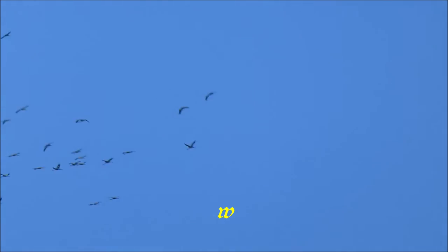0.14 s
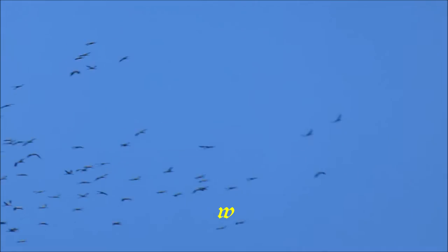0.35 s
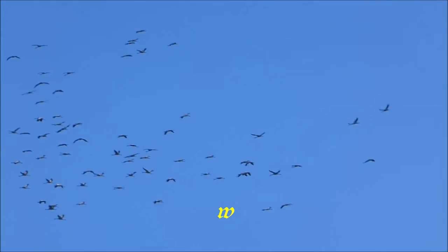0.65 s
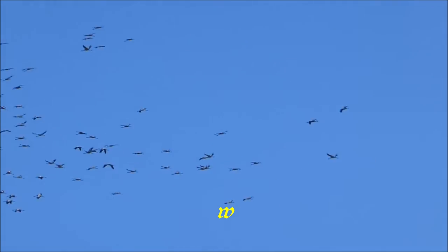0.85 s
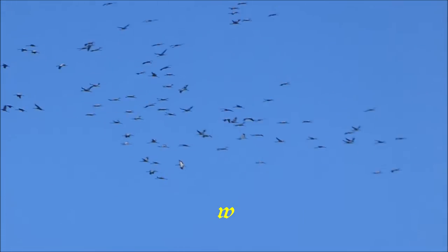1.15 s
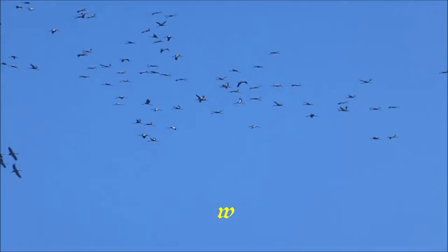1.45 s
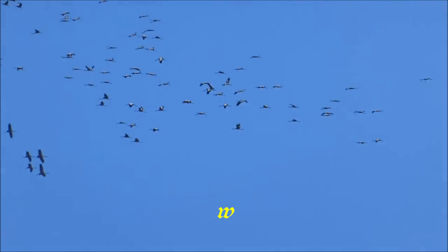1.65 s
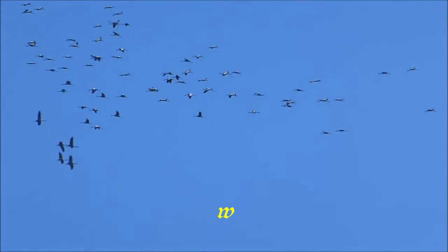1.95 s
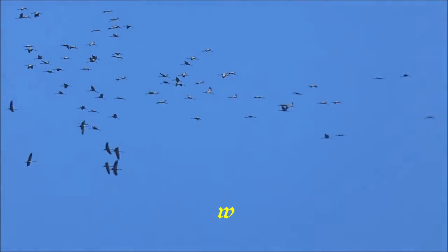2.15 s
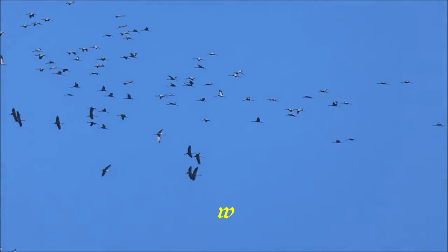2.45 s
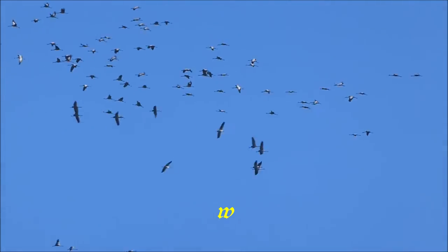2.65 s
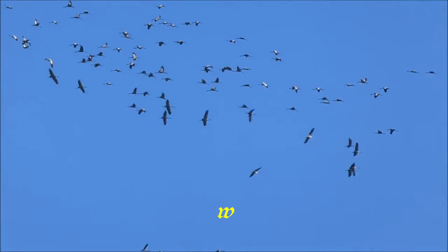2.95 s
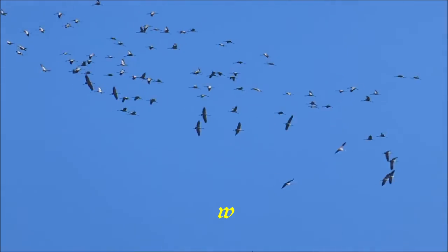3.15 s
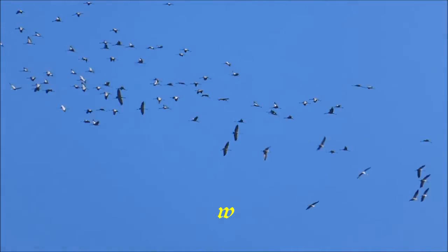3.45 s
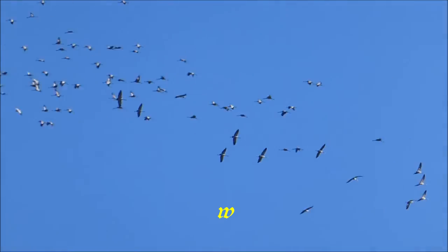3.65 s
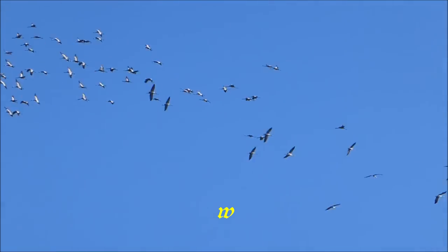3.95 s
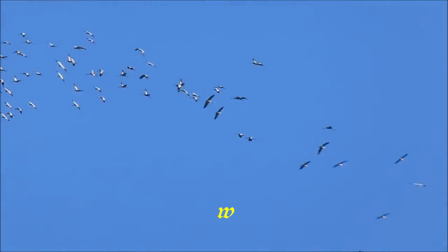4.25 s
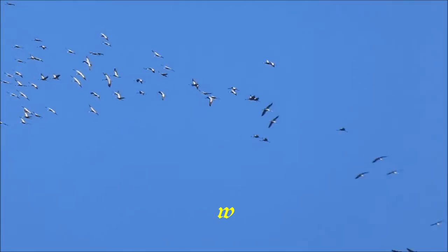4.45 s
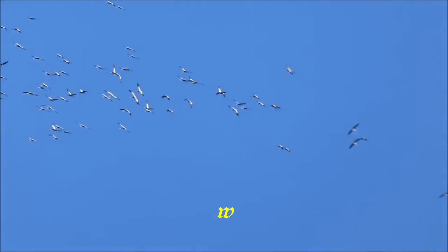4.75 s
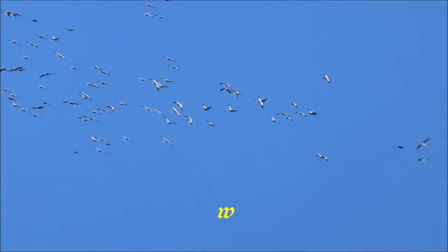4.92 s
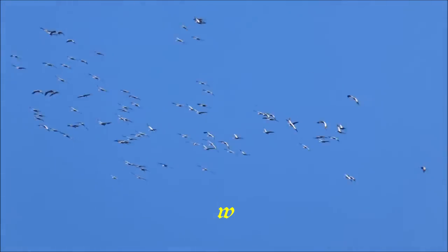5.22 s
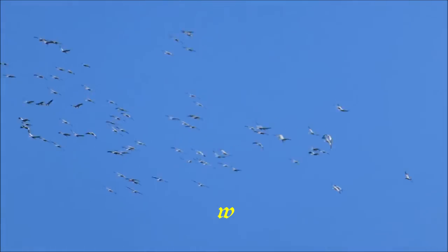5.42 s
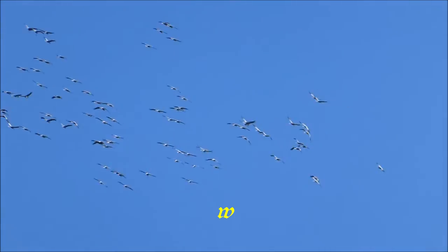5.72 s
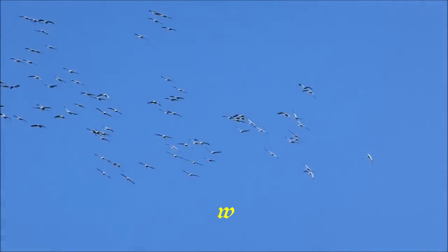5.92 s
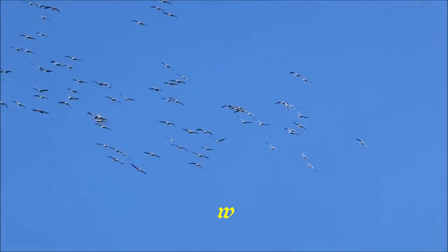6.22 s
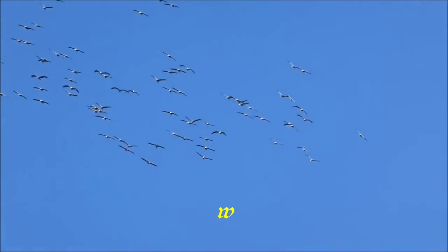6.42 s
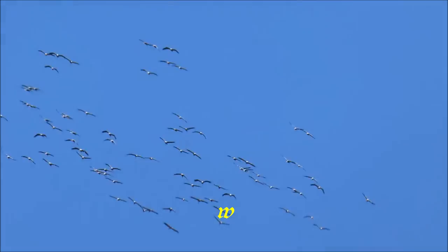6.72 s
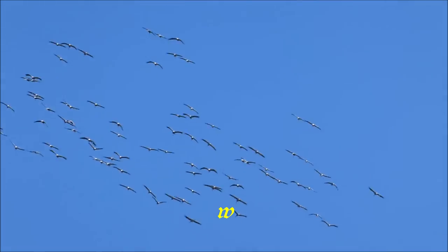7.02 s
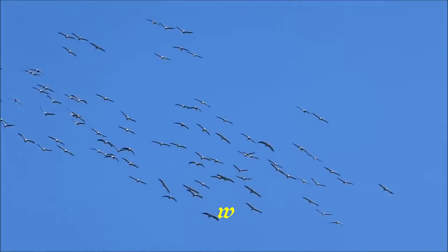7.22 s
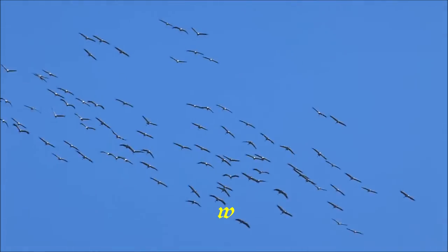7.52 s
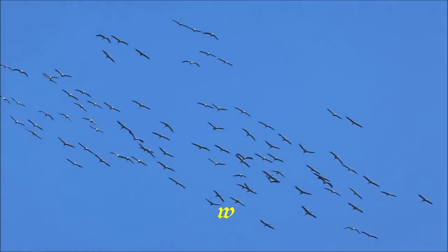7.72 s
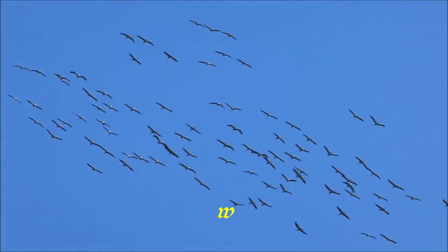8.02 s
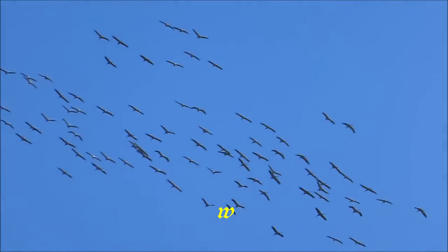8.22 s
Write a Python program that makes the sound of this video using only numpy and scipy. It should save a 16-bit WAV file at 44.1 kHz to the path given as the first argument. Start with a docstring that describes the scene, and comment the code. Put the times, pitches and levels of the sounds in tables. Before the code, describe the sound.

A large flock of cranes trumpets high overhead, many short rolling calls overlapping in a chorus that swells and sinks. In the first three seconds, three sharp handling clicks sound right at the microphone, and songbirds whistle and buzz in the trees. The cranes carry on and grow a little louder near the end, over a soft, distant outdoor rush.

```python
"""Cranes passing overhead

A large flock trumpets high above, its rolling calls pulsed by the syrinx and filtered by the windpipe.
Songbirds whistle and buzz in echoing trees, over a distant rush of open country, a faint low drone
and a brief opening hiss. A hand rubs a camera, whose shell clicks three times by stick-slip friction;
its gain control ducks after each click."""
import sys
import numpy as np
from scipy import signal
from scipy.fft import rfft, irfft
from scipy.io import wavfile
from scipy.ndimage import uniform_filter1d

SR = 44100
rng = np.random.default_rng(int(sys.argv[2]) if len(sys.argv) > 2 else 0)


def dump(signal):
    """Clip the signal to [-1, 1] and save it as 16-bit WAV at the path in sys.argv[1]."""
    limited = np.clip(np.atleast_2d(signal).T, -1, 1)
    pcm = np.round(limited * 32767).astype(np.int16)
    wavfile.write(sys.argv[1], SR, pcm)


N = 369116
TIME = np.arange(N) / SR


def gain_of(db):
    """Amplitude ratio of a level in decibels."""
    return 10 ** (np.asarray(db) / 20)


def unit_rms(x):
    """Normalisation to an rms of 1."""
    return x / np.sqrt(np.mean(x ** 2) + 1e-20)


def at_hz(points, hz):
    """Interpolation of a table on a logarithmic frequency axis."""
    f, value = np.transpose(points)
    return np.interp(np.log(hz + 1), np.log(f + 1), value)


def add(mix, s, sound):
    """Superposition of a sound at time s, cut to fit the mix."""
    start = round(s * SR)
    sound = sound[max(-start, 0):]
    part = mix[max(start, 0):][:len(sound)]
    part += sound[:len(part)]


def wander(t, per_s, size=256):
    """Random modulation: straight lines joining per_s Gaussian values a second."""
    return np.interp(t * per_s, np.arange(size), rng.standard_normal(size))


def arch(u, start, middle, end):
    """Parabolic glide through three pitches as u goes from 0 to 1."""
    return start * (1 - u) * (1 - 2 * u) + 4 * middle * u * (1 - u) + end * u * (2 * u - 1)


def woods(x, wet_db, linger=1):
    """Reverberation by scattering from trunks and crowns; each band decays at its own rate."""
    # decay of the echo: f/Hz, T60/s
    decay_times = [(500, 0.99), (1500, 1), (4000, 0.54), (8000, 0.5), (15000, 0.38)]
    reflections = rng.standard_normal(SR) * (rng.random(SR) < .05)
    hz, t, bands = signal.stft(reflections, SR, nperseg=256)
    t60 = linger * at_hz(decay_times, hz)[:, None]
    envelope = np.exp(-np.log(1000) * t / t60) * np.minimum(t / 0.0057, 1)
    tail = signal.istft(bands * envelope, SR, nperseg=256)[1]
    return x + gain_of(wet_db) * signal.fftconvolve(x, tail / np.linalg.norm(tail))[:N]


def distant_rush(level_db=-53.5, treble_rise=0.66):
    """Partially coherent noise: open country reaches the two microphones slightly unalike."""
    # spectral density: f/Hz, relative level/dB
    spectrum = [(25, -53), (60, -30), (85, -16.5), (125, -13), (190, -14), (270, -21), (370, -3.5),
                (480, 1.5), (750, -0.5), (1400, -4.5), (2000, -7.5), (2700, -14.5), (3150, -17),
                (3600, -15), (4550, -20.5), (5050, -18), (5800, -20), (7700, -27.5), (9900, -19.5),
                (15500, -29.5)]
    # slow fade: t/s, relative level/dB
    fade = [(0, -59.5), (1.3, -59), (3.3, -61), (4.7, -60.5), (8.37, -66.5)]
    # how strongly each band follows the fade: f/Hz, factor
    fade_weights = [(100, 0.42), (170, 0.43), (270, 3.2), (420, 0.99), (700, 0.6), (6000, 0.23)]
    # likeness of left and right: f/Hz, correlation
    coherence = [(30, 0.5), (90, 0.99), (200, 0.9), (380, 0.98), (800, 1), (1400, 1), (2400, 0.98),
                 (4400, 0.97), (8000, 0.92), (15000, 0.23)]
    hz, t, bands = signal.stft(rng.standard_normal((2, N)), SR, nperseg=2048)
    hz = hz[:, None]
    s, fade_db = np.transpose(fade)
    drift_db = at_hz(fade_weights, hz) * np.interp(t, s, fade_db - fade_db.mean())
    drift_db += at_hz([(700, 0), (6000, 0.67)], hz) * treble_rise * (t - t.mean())
    patches = uniform_filter1d(rng.standard_normal(bands.shape[1:]), size=14, axis=0)
    flicker_db = 1.5 * unit_rms(uniform_filter1d(patches, size=8, axis=1))
    mid, side = bands * gain_of(at_hz(spectrum, hz) + drift_db + flicker_db)
    correlation = at_hz(coherence, hz)
    side *= np.sqrt((1 - correlation) / (1 + correlation))
    stereo = signal.istft(np.array([mid + side, mid - side]), SR, nperseg=2048)[1]
    return gain_of(level_db) * unit_rms(stereo[:, :N])


def high_hiss(level_db=-60):
    """Spectrally shaped noise: a thin hiss that stops abruptly."""
    # spectral density: f/Hz, relative level/dB
    spectrum = [(7500, -12.5), (8700, -14), (9300, 5), (11500, 0), (12900, 1), (13800, -9), (16000, -19)]
    colour = gain_of(at_hz(spectrum, np.fft.rfftfreq(N, 1 / SR)))
    hiss = unit_rms(irfft(rfft(rng.standard_normal(N)) * colour, N))
    return gain_of(level_db) * hiss * np.interp(TIME, [.36, .4], [1, 0])


def drone(hz=103, wander_per_s=11, gain_db=-6):
    """Narrow-band noise: two randomly modulated carriers in quadrature give a far, wavering note."""
    # swell and fade: t/s, relative level/dB
    swells = [(0, -75), (1.1, -80), (4.4, -78), (4.71, -68), (5.15, -79), (6.3, -81), (7.18, -67),
              (7.8, -76), (8.37, -72)]
    phase = 2 * np.pi * hz * TIME
    note = wander(TIME, wander_per_s) * np.cos(phase) + wander(TIME, wander_per_s) * np.sin(phase)
    return gain_of(np.interp(TIME, *np.transpose(swells)) + gain_db) * unit_rms(note)


def crane_call(length, pitches, brass_db, roll, rasp, roll_hz=42, jitter=.011, flutter_db=2):
    """Source and filter: the syrinx pulses unevenly, with a rolling 'rr', into a long coiled windpipe."""
    # windpipe response heard from far below: f/Hz, gain/dB
    windpipe = [(550, 0), (780, -2.5), (950, 1), (1150, -1.5), (1400, -16.5), (1680, -23), (2050, -22.5),
                (2300, -37), (2900, -37), (4200, -41)]
    t = np.arange(int(max(length, .03) * SR)) / SR
    rolling = np.sin(2 * np.pi * roll_hz * rng.uniform(0.665, 1.547) * t + wander(t, 36.6))
    waver = .006 * wander(t, 35) + jitter * wander(t, 118.6)
    hz = arch(t / t[-1], *pitches) * (1 + waver + 0.0068 * roll * rolling)
    phase = 2 * np.pi * np.cumsum(hz) / SR + rng.uniform(0, 2 * np.pi)
    tone = sum(gain_of(at_hz(windpipe, k * hz) + brass_db * (k > 1)) * np.sin(k * phase)
               for k in range(1, 5))
    swell = (1 + roll * rolling) * gain_of(flutter_db * wander(t, 46.1)) * (1 + rasp * wander(t, 330))
    return np.sqrt(2) * tone * unit_rms(swell * signal.windows.tukey(len(t), .3))


def flock(count=600, usual_hz=925, below=.38, above=.27, spread=.2, off_pitch_db=-5.5, gain_db=-2):
    """Incoherent summation: far calls merge into a chorus, those off the common pitch being weaker."""
    # surges as the birds answer one another: t/s, relative level/dB, f/Hz that draws the common pitch
    surges = [(0.0, -44.5, 870), (0.42, -42.5, 971), (1.1, -45.5, 972.7), (1.32, -42, 991.5),
              (1.55, -45, 938.3), (2.2, -42, 915.8), (2.799, -43, 1012), (3.45, -48, 897.4),
              (4.15, -42.5, 989.6), (4.6, -46, 941), (5.05, -51, 886.6), (5.36, -42, 968),
              (6.079, -44.5, 920.2), (6.329, -36.5, 994), (6.58, -41, 946.4), (7.25, -40, 928.7),
              (7.7, -37.5, 962.3), (7.98, -42, 919.5), (8.37, -46, 935)]
    # brassiness: t/s, overtone gain/dB
    overtones = [(0, 7), (3.1, 6.5), (4.8, 0), (5.4, 3), (6.3, 6.5), (7.12, 4.5), (7.5, 2), (8.37, 4.5)]
    s, surge_db, surge_hz = np.transpose(surges)
    groups = np.zeros((5, N))  # each part of the flock has its own echoes
    offsets = rng.random(count) * (below + above) - below  # natural log of the pitch ratio
    for k, (when, stretch, rise, fall, scatter_db) in enumerate(rng.standard_normal((count, 5))):
        middle_s = TIME[-1] * k / (count - 1) + .02 * when
        hz = np.sqrt(usual_hz * np.interp(middle_s, s, surge_hz)) * np.exp(offsets[k])
        pitches = hz * np.array([.965 + 0.0449 * rise, 1, .955 + .04 * fall])
        brass_db = np.interp(middle_s, *np.transpose(overtones))
        call = crane_call(.125 * np.exp(.25 * stretch), pitches, brass_db, roll=0.71, rasp=0.49)
        call *= gain_of(scatter_db + off_pitch_db * (offsets[k] / spread) ** 2)
        add(groups[k % len(groups)], middle_s - len(call) / SR / 2, call)
    chorus = sum(woods(group, wet_db=-7) for group in groups)
    # levelled first, so that the chorus swells and sinks as one
    chorus /= np.sqrt(uniform_filter1d(chorus ** 2, size=6000) + 1e-9)
    return chorus * gain_of(np.interp(TIME, s, surge_db) + gain_db)


def near_cranes(gain_db=1, droop=.015):
    """Harmonic balance sets timbre: nearer calls, mellow or brassy, each arch on their own glide."""
    # calls: t/s, length/s, f/Hz, glide as a fraction of f, relative level/dB, overtone gain/dB
    calls = [(.05, 0.18, 794, -0.012, -47.5, 1.5), (0.194, 0.092, 975, 0.078, -44.5, -2),
             (0.248, 0.086, 1072, 0.013, -49, 9), (.308, 0.14, 928.4, -0.015, -42, 1),
             (.46, 0.098, 1197, 0.015, -46, -3), (0.452, 0.076, 1075, -0.039, -44.5, 2),
             (.497, 0.042, 931, 0, -44, 5), (0.519, 0.12, 872, -0.012, -48, 7),
             (0.681, 0.12, 1068, -0.012, -47.5, -1), (0.794, 0.074, 966, .05, -49, -1),
             (1.04, 0.084, 862, 0.034, -51, 6), (1.224, 0.13, 1068, -0.029, -41, 0),
             (1.363, 0.04, 993, 0.028, -40, -1), (1.404, .1, 992, -0.0026, -47.5, 1),
             (1.658, 0.11, 933, -0.039, -44, -2), (1.64, 0.17, 807, -0.022, -51, -2),
             (1.93, .1, 924.5, -0.015, -46, 2), (2.098, 0.09, 959, 0.071, -45, -1),
             (2.209, .13, 1078, 0.0037, -46, -2), (2.255, 0.15, 827, -0.024, -45, 4),
             (2.39, 0.11, 820, 0.003, -56, 14), (2.49, 0.083, 955, -0.068, -44, -5),
             (2.72, .11, 1072, -0.024, -44, 0), (3, .1, 1148, 0.048, -48.5, 2),
             (3.06, .077, 868, .05, -49.5, 7), (3.446, .12, 710, -0.093, -53, -2),
             (3.947, 0.092, 1046, 0.029, -48.5, 3), (4.032, 0.11, 1038, -0.047, -45.5, 0),
             (4.171, 0.042, 1008, 0.053, -42.5, 2), (4.21, .13, 990, -0.019, -55, 11.5),
             (4.679, 0.23, 948.5, -0.0055, -48.5, -12), (4.925, 0.14, 745, 0.065, -54.5, -2),
             (5.212, 0.089, 1066, -0.052, -46, -6), (5.337, 0.12, 905, -.015, -47.5, 10),
             (5.361, .09, 1049, -0.027, -46.5, -2), (5.685, 0.092, 1014, 0.044, -47, 1),
             (6.037, 0.031, 919, -0.014, -46, 4), (6.202, 0.1, 1079, 0.083, -42.5, -7),
             (6.265, 0.12, 939, -0.074, -39, 3), (6.299, .08, 1119, 0.011, -42, 1),
             (6.36, 0.1052, 1055, -0.136, -38.5, -4), (6.33, 0.11, 830, -.01, -50, 9),
             (6.47, 0.15, 828, -0.0056, -53.5, 15), (6.681, .073, 1015, -0.055, -50, 2),
             (6.93, .15, 834, 0.037, -45, 6.5), (7.08, .14, 862, .035, -47.5, 11),
             (7.131, 0.028, 924, -0.009, -43, 2), (7.151, 0.083, 965, .1, -48, 13),
             (7.368, .2, 1107, 0.004, -45.5, -9), (7.605, 0.049, 882, .04, -38, -6),
             (7.607, 0.048, 982, -0.024, -41, -7), (7.699, 0.1, 941, -0.018, -43, -6),
             (7.75, 0.084, 1092, 0.023, -47, -6), (7.881, .032, 950, -0.018, -46.5, -2),
             (7.944, .12, 775, 0.032, -52, 5), (8.075, 0.097, 956, -0.045, -47, -6),
             (8.271, 0.075, 940, .034, -47.5, 1)]
    out = np.zeros(N)
    for s, length, hz, glide, db, brass_db in calls:
        pitches = hz * np.array([1 - droop - glide / 2, 1, 1 - droop + glide / 2])
        call = crane_call(length, pitches, brass_db, roll=0.26, rasp=0.2, jitter=0.0076, flutter_db=3)
        add(out, s, gain_of(db) * call)
    return gain_of(gain_db) * woods(out, wet_db=-7.5)


def bird_note(length, pitches, db, buzz, taper, buzz_hz=170, flutter_db=3.5):
    """Frequency modulation: a fast uneven trill shakes a songbird's gliding sine into a buzz."""
    t = np.arange(int(max(length, .02) * SR)) / SR
    trill = np.sin(2 * np.pi * buzz_hz * t + 1.76 * wander(t, 150)) + 1.02 * wander(t, 719)
    hz = arch(t / t[-1], *pitches) * (1 + buzz * trill + 0.0038 * wander(t, 285))
    note = np.sin(2 * np.pi * np.cumsum(hz) / SR) * gain_of(flutter_db * wander(t, 103.6))
    return gain_of(db) * unit_rms(note * signal.windows.tukey(len(t), taper))


def far_twitter(count=45, low_hz=2600, high_hz=7280, level_db=-78, spread_db=3, glide=.05):
    """Beyond the critical distance echo outweighs direct sound: tiny random chirps deep in the woods."""
    out = np.zeros(N)
    for when, place, stretch, size, slope in rng.random((count, 5)):
        hz = low_hz * (high_hz / low_hz) ** place
        pitches = hz * (1 + glide * (2 * slope - 1) * np.array([-1, 0, 1]))
        db = level_db + spread_db * (2 * size - 1)
        add(out, when * TIME[-1], bird_note(0.0246 + .04 * stretch, pitches, db, buzz=0.0066, taper=0.76))
    return woods(out, wet_db=2.5)


def whistling_birds(gain_db=1.5, near_db=-51, near_wet_db=-6.5, wet_per_db=0.4):
    """The direct-to-reverberant ratio falls with distance: fainter whistles blur more into echo."""
    # pure, nearly level whistles: t/s, length/s, f/Hz, relative level/dB
    whistles = [(0.76, 0.035, 4000, -66), (0.778, 0.07, 3580, -62.5), (0.837, 0.062, 4430, -61.5),
                (0.915, 0.07, 3180, -62), (1.0, 0.065, 3890, -63), (1.023, 0.12, 4460, -67),
                (1.149, 0.061, 3830, -65), (1.29, 0.08, 4380, -61), (1.74, 0.05, 8410, -48),
                (4.159, 0.053, 4190, -62.5), (4.294, 0.052, 4570, -61.5), (5.672, 0.14, 4315, -53.5),
                (6.028, 0.18, 4230, -51.5), (6.76, 0.053, 3520, -67), (7.41, .05, 4430, -73),
                (8.185, 0.024, 6040, -64.5)]
    # one bird's thin rising 'seee': t/s, relative level/dB
    rising_calls = [(.352, -70), (3.766, -80), (6.39, -74)]
    rising_s, rising_hz = 0.26, (7400, 7930, 7880)
    out, rising = np.zeros((2, N))
    for s, length, hz, db in whistles:
        note = np.zeros(N)
        pitches = hz * np.array([.992, 1, 1])
        add(note, s, bird_note(length, pitches, db, buzz=0.0069, taper=0.31, flutter_db=4))
        wet_db = near_wet_db + wet_per_db * max(near_db - db, 0)
        out += woods(note, wet_db, linger=1.25) / np.hypot(1, gain_of(wet_db))
    for s, db in rising_calls:
        add(rising, s, bird_note(rising_s, rising_hz, db, buzz=0.0045, taper=0.6, flutter_db=-1))
    return gain_of(gain_db) * (out + woods(rising, wet_db=-3.5))


def buzzy_birds(gain_db=-6):
    """Modulation sidebands roughen falling slurs and two-voiced chips that echo from deep in the trees."""
    # slurs: t/s, length/s, f/Hz, relative level/dB, buzz as a fraction of f
    slurs = [(1.788, 0.076, 7450, -47.5, 0.048), (1.884, 0.065, 8470, -48.5, 0.024),
             (1.956, 0.045, 7380, -42.5, 0.017), (2.006, 0.052, 4860, -44, 0.068),
             (2.02, 0.056, 3895, -43.5, 0.041), (2.11, 0.051, 4247, -37, 0.0093),
             (2.13, 0.06, 3970, -41.5, 0.018), (2.173, 0.05, 4530, -49.5, .05),
             (2.204, 0.057, 3790, -51, 0.029), (2.258, 0.078, 3280, -58, .035),
             (2.314, .14, 2727, -53, 0.0156), (2.57, 0.11, 7700, -51, 0.022),
             (2.624, 0.074, 5610, -45.5, 0.0082), (2.67, 0.113, 7840, -48, 0.029),
             (2.726, 0.053, 6020, -48, 0.029), (5.293, 0.16, 5530, -61.5, 0.03),
             (5.493, 0.17, 5850, -60, 0.049), (5.873, 0.16, 5110, -60, 0.037), (7.78, .05, 7080, -69, .012),
             (8.088, .06, 6940, -67, .035)]
    # sharp chips: t/s
    chip_times = [0.563, 4.865]
    # their voices: length/s, start f/Hz, middle f/Hz, end f/Hz, relative level/dB, buzz as above
    chip_voices = [(0.046, 9220, 8420, 8000, -51, 0.042), (.1, 6820, 6450, 5400, -52.5, 0.055)]
    out = np.zeros(N)
    for s, length, hz, db, buzz in slurs:
        sag = 0.0158 + 1.56 * buzz  # buzzier slurs fall farther
        pitches = hz * np.array([1 + 0.613 * sag, 1, 1 - 0.25 * sag])
        add(out, s, bird_note(length, pitches, db, buzz, taper=0.59))
    for s in chip_times:
        for length, *pitches, db, buzz in chip_voices:
            add(out, s, bird_note(length, pitches, db, buzz, taper=0.49))
    return gain_of(gain_db) * woods(out, wet_db=-1)


def ring(x, spectrum, size=2048):
    """Minimum-phase filtering: a body with this spectrum rings only after it is pushed."""
    log_gain = np.log(gain_of(at_hz(spectrum, abs(np.fft.fftfreq(size, 1 / SR)))))
    response = np.fft.ifft(np.exp(np.conj(signal.hilbert(log_gain)))).real
    return signal.oaconvolve(x, response / np.linalg.norm(response))[:N]


def shell_knock(pitch_hz, db_per_octave=40):
    """Damped modes of the camera's shell; a snap excites mostly those near its own pitch."""
    # modes: f/Hz, relative level/dB, T60/s
    modes = [(1950, 0, 0.023), (2560, 5, 0.029), (3240, -2, 0.019), (3500, 3, 0.018), (4010, 0, 0.02),
             (5940, -1, 0.016)]
    t = np.arange(2000) / SR
    ringing = np.zeros(len(t))
    for hz, db, t60 in modes:
        amplitude = gain_of(db - db_per_octave * abs(np.log2(hz / pitch_hz)))
        ringing += amplitude * np.exp(-np.log(1000) * t / t60) * np.sin(2 * np.pi * hz * t)
    # a small shell gives no bass, and a soft fingertip no treble
    return signal.sosfilt(signal.butter(4, [1300, 6500], "bandpass", fs=SR, output="sos"), ringing)


def camera_handling(tick_s=.0007, side_db=-7):
    """Stick-slip friction on the camera's shell: soft rubs, and finger slips that build up to a snap."""
    # slips, mostly in clusters: t/s, level/dB, rise/s, decay/s, tick level/dB, knock level/dB, knock f/Hz
    slips = [(0.9528, -33.5, 0.0068, 0.0022, -42, -20, 3150),
             (0.9556, -23.5, 0.003, .0012, -20, -21.5, 3200), (0.9574, -35, .001, .001, -40, -14, 1900),
             (0.971, -39, 0.0055, 0.0037, -49, -52, 3500), (1.7323, -32, .002, 0.00096, -46, -21, 3400),
             (2.8368, -26, 0.0041, 0.0017, -32, -28, 5750), (2.8382, -29, 0.0012, 0.001, -15.5, -25, 1950),
             (2.839, -40, 0.00091, .001, -36, -20, 3950), (2.847, -37, 0.0036, 0.0049, -42, -35, 3950),
             (2.858, -39, 0.0072, .0054, -40, -37, 3950)]
    # rubs of the hand: t/s, length/s, level/dB
    rubs = [(0.894, 0.075, -53), (1.552, 0.13, -50), (1.64, 0.15, -50.5), (2.757, 0.081, -51.5),
            (6.523, 0.29, -61), (7.143, 0.14, -46.5), (7.223, 0.22, -57)]
    # response of the shell: f/Hz, relative level/dB
    shell_spectrum = [(40, -55), (300, -24), (900, -14), (1400, -8.5), (1950, 8), (2600, -3), (3400, 6.5),
                      (4200, 1), (4900, -16), (5800, -6), (7800, -20), (9800, -6), (12000, -18),
                      (15500, -19)]
    # colour of the sharp tick: f/Hz, relative level/dB
    tick_spectrum = [(40, -45), (300, -15), (900, -3), (3000, -7), (5800, 6), (7800, -7), (9900, 5.5),
                     (11500, -5), (14200, 1), (15700, -4)]
    force, tick, knock = np.zeros((3, N))
    for s, db, rise_s, decay_s, tick_db, knock_db, knock_hz in slips:
        t = TIME - s
        force += gain_of(db) * np.exp(-np.maximum(-t / rise_s, (t - .001) / decay_s).clip(0))
        tick += gain_of(tick_db) * np.exp(-abs(t) / tick_s)
        add(knock, s, gain_of(knock_db) * shell_knock(knock_hz))
    for s, length, db in rubs:
        add(force, s, gain_of(db) * signal.windows.hann(int(length * SR)))
    grit, crack, side_noise = rng.standard_normal((3, N))
    mid = ring(force * grit, shell_spectrum) + ring(tick * crack, tick_spectrum) + knock
    # so close by, the shortest waves reach the two microphones unalike: f/Hz, relative level/dB
    side_spectrum = [(1000, -18), (3000, -13), (6500, -23), (9000, -2), (11500, -6), (15500, -7)]
    side = gain_of(side_db) * ring((tick + 0.58 * force) * side_noise, side_spectrum)
    return np.array([mid + side, mid - side])


def scene():
    """Superposition: the birds sit in the middle of the wider background."""
    birds = near_cranes() + flock() + buzzy_birds() + whistling_birds() + far_twitter()
    return birds + camera_handling() + high_hiss() + drone() + distant_rush()


def record(dry, threshold_db=-29.5, attack_s=.009, release_db_per_s=85, cutoff_hz=15750):
    """Automatic gain control ducks after loud snaps, recovering fast, then slowly; a low-pass follows."""
    power_db = 10 * np.log10(abs(uniform_filter1d((dry ** 2).mean(0), size=100)) + 1e-12)

    def excess_db(db_per_s):
        """Peak detection: height above the threshold of a held level that falls steadily."""
        held_db = np.maximum.accumulate(power_db + db_per_s * TIME) - db_per_s * TIME
        return np.maximum(held_db - threshold_db, 0)

    duck_db = np.maximum(excess_db(release_db_per_s), 0.21 * excess_db(db_per_s=25))
    pole = np.exp(-1 / (attack_s * SR))
    ducked = dry * gain_of(-signal.lfilter([1 - pole], [1, -pole], duck_db))
    lowpass = signal.firwin(511, cutoff_hz, window=("kaiser", 9), fs=SR)
    return signal.oaconvolve(ducked, lowpass[None], "same")


dry = scene()
out = record(dry)
dump(out)
```